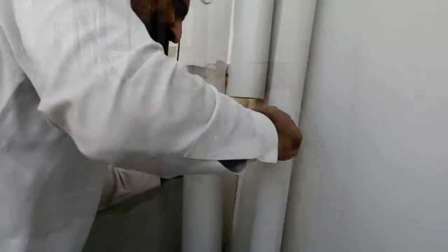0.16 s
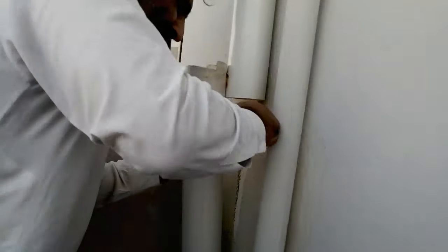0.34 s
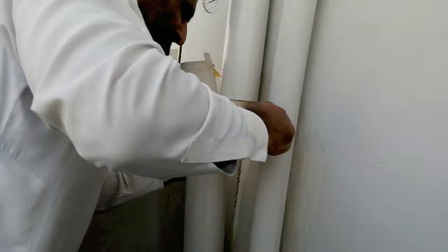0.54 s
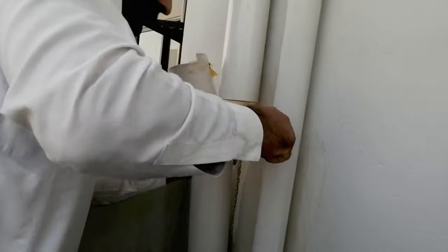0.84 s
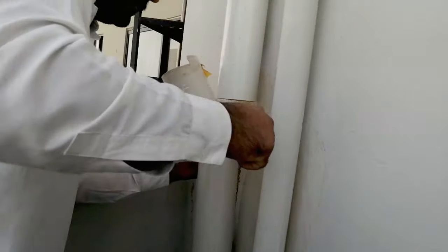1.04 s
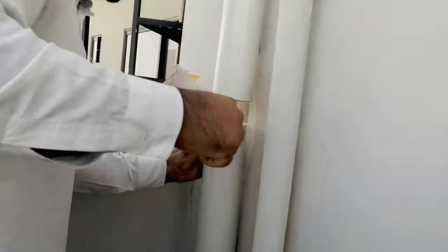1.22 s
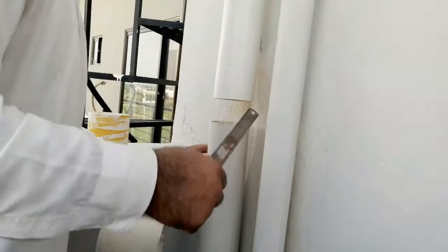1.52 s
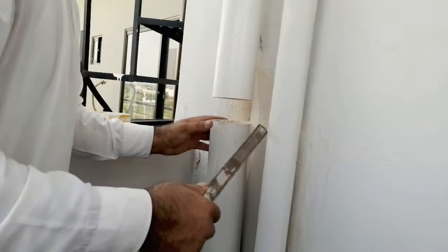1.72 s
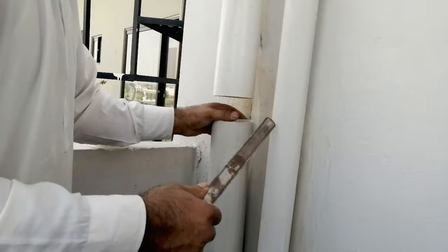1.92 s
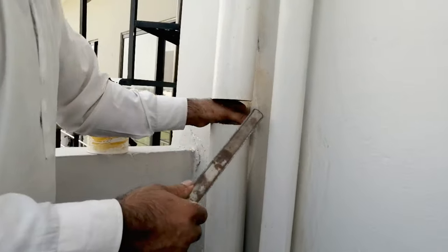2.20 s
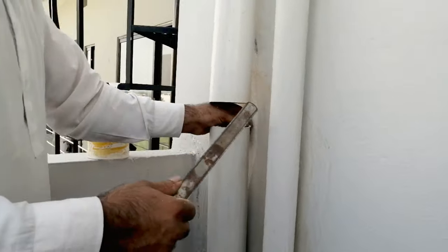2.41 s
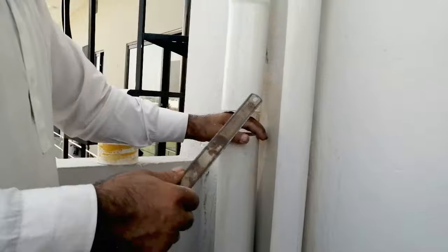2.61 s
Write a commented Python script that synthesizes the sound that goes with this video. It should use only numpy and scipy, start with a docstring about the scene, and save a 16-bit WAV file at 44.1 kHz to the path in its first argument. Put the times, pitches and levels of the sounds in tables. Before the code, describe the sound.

Close phone pickup beside a balcony wall: fast gritty sawing through hollow plastic pipe ends early, followed by soft shuffling, thin blade scrapes, and light plastic rubs and taps over a very faint distant town.

```python
"""Quiet balcony, beside a wall, close to a phone's two microphones; a faint low town lies behind throughout.
First a hand saw rasps through a plastic drain pipe in quick strokes: trains of tooth clicks ring the pipe wall,
and damped jolts mark where the blade catches. At 0.66 s the freed pipe hums as slowly dying modes, then shuffles.
From 0.9 s dense slips and a gliding resonance scrape the blade back out, with knocks among them.
After 2.1 s the loose end rubs and knocks its mate: slips in a plastic colour, cracks, rim modes and thuds."""
import sys
import numpy as np
from scipy import signal
from scipy.fft import rfft, irfft
from scipy.io import wavfile
from scipy.ndimage import uniform_filter1d

SR = 44100
rng = np.random.default_rng(int(sys.argv[2]) if len(sys.argv) > 2 else 0)


def to_wav(sig):
    """Store sig (one row per channel, or 1-D mono) as 16-bit WAV at the path in sys.argv[1].

    Samples outside -1..1 are clipped; the rate is SR.
    """
    pcm = np.clip(np.atleast_2d(sig), -1, 1) * 32767
    pcm = np.round(pcm).astype(np.int16)
    wavfile.write(sys.argv[1], SR, pcm.T)  # frames by channels


N = 121275
T = np.arange(N) / SR  # t/s
HALF_S = SR // 2  # samples in half a second, the length of every short ring

# distant town, relative colour [f/Hz, level/dB]
TOWN_COLOUR = [(20, 2), (50, 8), (90, 4), (170, -4.5), (300, -4), (600, -7.5), (1000, -10), (2000, -30.5),
               (4000, -33), (5400, -24), (8000, -40), (16000, -43)]
TOWN_DB = -52.5

# saw strokes, then two faint chatters of the blade once the pipe is cut through
# [start t/s, attack/s, end of push t/s, release/(dB/s), rasp level/dB,
# fine chip hiss level/dB re rasp, pipe wall level/dB re rasp]
STROKES_AND_CHATTERS = [(-.06, 0.018, .006, 393, -32.5, -20.5, -6),
                        (.065, 0.045, 0.16, 431, -32.5, -26, 6.5),
                        (.241, 0.031, 0.36, 434, -22.5, -28, -4.5), (.388, .045, .47, 183, -25.5, -32, 4.5),
                        (.552, 0.035, 0.6, 280, -23, -27, -0.5), (.616, 0.025, .658, 512, -21.5, -13, -4.5),
                        (.685, 0.016, .714, 350, -36, -10.5, -0.5),
                        (0.734, 0.014, .756, 450, -43.5, -22, 7)]
# rasp of the teeth, relative colour [f/Hz, level/dB]
RASP_COLOUR = [(40, -30), (110, -2.5), (200, -10), (300, 14.5), (430, 3.5), (560, 7), (750, -0.5),
               (1050, -1), (1400, 1), (1800, -6.5), (2800, -9), (4000, -17), (5400, -16), (7000, -15.5),
               (9000, -21.5), (16000, -36.5)]
# wall modes of the clamped pipe [f/Hz, relative level/dB, t60/s]
CLAMPED_PIPE_MODES = [(272.4, 4.5, 0.17), (310, -2.5, 0.26), (523, 2, 0.071), (585.6, -9, 0.27),
                      (658.4, 2.5, 0.063), (826, -6, 0.072), (950, -13.5, 0.07), (1002, -7.5, 0.064),
                      (1305, -25, 0.087), (1416, -20.5, 0.058), (1450, -31, 0.12), (2610, -19, 0.074)]
TOOTH_HZ, SLOWEST_SPEED = 1195.7, .35  # tooth rate at full speed; lowest share of that speed
TOOTH_JITTER, TOOTH_SPREAD_DB = .2, 3.5  # unevenness of tooth rate (natural log) and of click level
CHIP_SHARE = 0.92  # steady chip noise added to the teeth
BITE_DB, BITE_PER_S = 1.94, 140  # the teeth bite unevenly: spread, and cutoff in Hz
SAG_DB_PER_S = 96  # each push weakens after its attack
DRAG_DB, DRAG_WALL_DB = -46.5, -41  # the blade drags between strokes: rasp and wall
THROUGH_S, DRAG_FADE_S = 0.61, 0.078  # the drag has faded out when the cut is through
RUMBLE_DB = -16

# the blade catches and jolts the pipe [t/s, level/dB]
BLADE_CATCHES = [(.11, -28), (0.149, -21), (.175, -25), (0.258, -18.5), (.284, -19.5), (.422, -14),
                 (0.476, -21), (.584, -25), (.647, -24.5), (0.655, -30)]
JOLT_HZ, JOLT_T60_S = 287.7, 0.074

# a thin high ring [t/s, length/s, level/dB before the common gain]
THIN_RING_SWELLS = [(0.231, 0.051, -51.5), (.785, 0.016, -53), (.822, 0.0093, -49), (.858, .012, -54),
                    (1.222, 0.066, -58), (1.775, 0.055, -54), (1.935, .02, -50)]
THIN_RING_HZ, THIN_RING_WIDTH_HZ, THIN_RING_GAIN_DB = 5200, 430, -11.5

# modes of the freed pipe [f/Hz, relative level/dB, t60/s]
FREED_PIPE_MODES = [(168.5, 3.5, 0.63), (300, -12, 0.12), (379, -9, 0.83), (468, -15, 0.26),
                    (662, -11, 0.5), (760, -14, 0.37), (890, -12, 0.39)]
FREED_S, FREED_DB, FREED_WAVER_DB = .657, -28.5, 2

# the loose pipe shuffles in the hand [t/s, length/s, level/dB]
HAND_SHUFFLES = [(.76, .06, -43.5), (.88, 0.036, -49), (.935, 0.042, -43), (1.01, 0.031, -71),
                 (1.88, 0.064, -50), (2.205, 0.036, -46), (2.29, 0.021, -46.5), (2.52, 0.026, -45.5)]
# relative colour of the shuffles [f/Hz, level/dB]
SHUFFLE_COLOUR = [(40, -24), (130, 7.5), (230, 6), (480, 5.5), (700, 1.5), (1100, -13), (2000, -12.5),
                  (16000, -59)]

# scraping effort [t/s, level/dB before the common gain]
SCRAPE_EFFORT = [(.86, -70), (.915, -40.5), (.976, -47), (1.01, -35.5), (1.055, -41), (1.098, -49),
                 (1.134, -65.5), (1.23, -57), (1.278, -50.5), (1.352, -40.5), (1.432, -43.5),
                 (1.548, -36.5), (1.58, -56.5), (1.645, -68.5), (1.67, -57.5), (1.716, -76), (1.805, -60.5),
                 (1.856, -33), (1.905, -44.5), (1.928, -58), (1.972, -59), (2.03, -81), (2.305, -67),
                 (2.326, -51.5), (2.362, -47.5), (2.42, -49), (2.458, -45), (2.535, -41), (2.574, -49.5),
                 (2.62, -64), (2.65, -59), (2.662, -53.5), (2.71, -65), (2.75, -61)]
# blade on plastic, also the saw's chip hiss: relative colour [f/Hz, level/dB]
BLADE_COLOUR = [(60, -12), (300, -6.5), (950, -12), (1500, 1), (2200, -3), (3200, -4.5), (5400, -6),
                (7000, -1), (10000, -4), (16000, -10)]
# plastic on plastic, relative colour [f/Hz, level/dB]
RUB_COLOUR = [(60, -16), (280, -6), (650, -3), (1200, -7.5), (2000, 2), (2900, 2.5), (4000, -1.5),
              (5400, -3), (7000, -0.5), (10000, -7), (16000, -10)]
# resonance of the blade as it slides [t/s, f/Hz]
BLADE_GLIDE = [(.9, 1400), (.99, 1650), (1.04, 2100), (1.1, 2086), (1.3, 1443), (1.41, 1497), (1.48, 1847),
               (1.55, 2092), (1.83, 1745), (1.9, 1548)]
SCRAPE_GAIN_DB, JUDDER_DB = -1, 1.7
SLIPS_PER_S, SLIP_JITTER, SLIP_SPREAD_DB = 7900, .4, 2.5
RUB_FROM_S, RUB_JUDDER_DB = 2.1, 0.9  # plastic on plastic slips less evenly
BLADE_WIDTH_HZ, BLADE_RING_DB = 235, -6.5  # level re scraping effort
OVERTONE_RATIO, OVERTONE_DB = 1.62, -12

# knocks of the pipe end [t/s, click level/dB re crack and rim levels, lower edge of the click f/Hz,
# thud f/Hz, thud level/dB, thud t60/s]
PIPE_KNOCKS = [(0.91, -9.5, 300, 466, -34.5, .05), (1.197, -19.5, 1500, 1500, -64, 0.018),
               (1.262, -13, 4000, 5500, -65, 0.017), (1.903, -10, 292, 247, -40.5, 0.057),
               (1.9829, 5, 850, 1103, -30.5, .04), (2.1604, -1, 181, 568, -28, 0.044),
               (2.2569, -5, 180, 309, -31, 0.069), (2.486, -21, 300, 377, -38.5, 0.014),
               (2.5803, 1.5, 2680, 4660, -37, 0.026), (2.723, -17.5, 2470, 4670, -61, 0.024)]
# modes of the cut rim [f/Hz, relative level/dB, t60/s]
RIM_MODES = [(252, -13, 0.09), (747, -8, 0.046), (1029, -7.5, 0.12), (1140, -8, 0.068), (1340, -4, 0.048),
             (2336, -5.5, 0.029), (2850, -13, 0.023), (3260, -8, 0.017), (4610, -8, 0.028),
             (5780, -10, .025), (7330, -16, .025)]
# relative colour of a crack [f/Hz, level/dB]
CRACK_COLOUR = [(100, -4), (800, 0.5), (1300, 5.5), (2000, 2), (3000, 0.5), (5000, 1), (7000, 2.5),
                (9000, -6), (16000, -13)]
# cluster of modes in a thud [ratio to thud f, level/dB re thud]
THUD_CLUSTER = [(.78, -9), (0.999, 7.5), (1.23, -7)]
RIM_DB, CRACK_DB, CRACK_T60_S = -33, -30.5, 0.058
CONTACT_S = 0.0015  # rise of every knock

# colour of the balcony tail [f/Hz, level/dB]
ROOM_COLOUR = [(60, -2.5), (300, 4), (1000, 0), (3000, -2), (16000, -4)]
ROOM_DB, ROOM_T60_S = -12, 0.33
SPLIT_HZ = 970  # shared bass below, separate treble above
TURN_DB, TURN_S = 5.5, 1.95  # the treble leans left: the knocks lie nearer the middle than the saw

# microphone colour [f/Hz, level/dB]
MIC_COLOUR = [(100, -8.5), (300, -2), (500, -3.5), (800, 0), (1200, 3), (2000, 2), (3200, 6.5), (3850, 0),
              (4700, 5), (5050, 10.5), (5370, 15.5), (5800, 9), (7000, 2), (8000, -5), (12500, -6),
              (14000, -5.5), (15000, -1), (16000, -17)]
# balance of the two ports [f/Hz, left minus right level/dB]
PORT_BALANCE = [(60, 2), (300, -0.5), (700, -1.5), (1300, 0), (2400, -8), (4400, -12), (5600, -10.5),
                (8100, 6), (11000, -1.5), (15000, -10.5)]
TOP_HZ = 16000


def amp(db):
    """Decibels to gain."""
    return np.exp(np.asarray(db) * (np.log(10) / 20))


def unit(x):
    """Scale to rms 1."""
    return x / np.sqrt(np.mean(x ** 2) + 1e-18)


def noise():
    """Two channels of unrelated white noise."""
    return rng.standard_normal((2, N))


def edge(x, hz, kind, order=2):
    """Low-pass or high-pass."""
    return signal.sosfilt(signal.butter(order, hz, kind, fs=SR, output="sos"), x)


def walk(rate_hz):
    """Smooth chance with spread 1, wandering below a cutoff."""
    return unit(edge(rng.standard_normal(N), rate_hz, "low"))


def curve(points):
    """Straight lines through (t/s, value) points."""
    return np.interp(T, *np.array(points).T)


def swells(rows):
    """Bell-shaped swells from (t/s, length/s, level/dB) rows."""
    return sum(amp(db) * np.exp(-np.minimum(((T - at) / length) ** 2, 20)) for at, length, db in rows)


def add(out, start, x):
    """Mix a short sound in at a moment."""
    part = out[..., int(start * SR):][..., :x.shape[-1]]
    part += x[..., :part.shape[-1]]


def conv(x, impulse):
    """Pass a sound through an impulse response."""
    return signal.oaconvolve(np.atleast_2d(x), np.atleast_2d(impulse), axes=1)[:, :x.shape[-1]]


def response(points, share=1):
    """Causal, minimum-phase impulse response of a (f/Hz, level/dB) colour."""
    hz, db = np.array(points, float).T
    size = 2048
    log_hz = np.log(np.fft.rfftfreq(size, 1 / SR) + 1)
    level_db = share * np.interp(log_hz, np.log(hz), db)
    cepstrum = irfft(np.log(amp(level_db)))
    # folding the cepstrum onto positive time makes the response causal
    cepstrum[1:size // 2] *= 2
    cepstrum[size // 2 + 1:] = 0
    return irfft(np.exp(rfft(cepstrum)))


def colour(x, points):
    """Colour a sound without changing the power of white noise."""
    impulse = response(points)
    return conv(x, impulse / np.linalg.norm(impulse))


def fade(t60):
    """Half a second of exponential decay."""
    return np.exp(-np.log(1000) * T[:HALF_S] / t60)


def ring(modes):
    """Damped modes (f/Hz, level/dB, t60/s) after a blow."""
    return sum(amp(db) * fade(t60) * np.sin(2 * np.pi * hz * T[:HALF_S]) for hz, db, t60 in modes)


def band(hz, width_hz):
    """A randomly driven resonance whose centre may move."""
    phase = 2 * np.pi * np.cumsum(hz * np.ones(N)) / SR
    in_phase = edge(noise(), width_hz / 2, "low") * np.cos(phase)
    quadrature = edge(noise(), width_hz / 2, "low") * np.sin(phase)
    return unit(in_phase + quadrature)


def clicks(rate, jitter, spread_db):
    """Uneven train of clicks at a rate per second, with separate levels in the two channels."""
    turns = np.floor(np.cumsum(rate * np.exp(jitter * walk(400))) / SR)
    levels = amp(spread_db * np.clip(noise(), -2, 2))
    return unit(np.diff(turns, prepend=0) * levels)


def town():
    """Distant town: steady noise, mostly low; bass shared by the ports in scene(), treble separate."""
    return amp(TOWN_DB) * colour(noise(), TOWN_COLOUR)


def saw():
    """Teeth tear chips, or chatter at the end, at a rate that follows each push; the pipe wall rings with them."""
    dragging = np.clip((THROUGH_S - T) / DRAG_FADE_S, 0, 1)
    force = amp(DRAG_DB) * dragging
    shake = amp(DRAG_WALL_DB) * dragging
    hiss = 0
    speed = np.full(N, SLOWEST_SPEED)
    for start, attack, end, release_db_per_s, db, hiss_db, wall_db in STROKES_AND_CHATTERS:
        rise = np.clip((T - start) / attack, 0, 1) ** 2
        sag_db = SAG_DB_PER_S * np.maximum(T - start - attack, 0)
        release_db = release_db_per_s * np.maximum(T - end, 0)
        push = rise * amp(db - sag_db - release_db)
        force = np.hypot(force, push)
        shake = np.hypot(shake, push * amp(wall_db))
        hiss = hiss + push * amp(hiss_db)
        progress = np.clip((T - start) / (end - start + .03), 0, 1)
        speed = np.maximum(speed, np.sin(np.pi * progress))
    # denser clicks are made weaker, so speed alone does not change the power
    teeth = clicks(TOOTH_HZ * speed, TOOTH_JITTER, TOOTH_SPREAD_DB) * np.sqrt(speed.mean() / speed)
    chips = teeth - uniform_filter1d(teeth, size=200) + CHIP_SHARE * noise()
    cut = unit(chips * amp(BITE_DB * walk(BITE_PER_S)))
    wall = ring(CLAMPED_PIPE_MODES)
    rasp = colour(cut * force, RASP_COLOUR)
    wall_ring = conv(cut * shake, wall / np.linalg.norm(wall))
    chip_hiss = colour(hiss * cut, BLADE_COLOUR)
    rumble = amp(RUMBLE_DB) * np.sqrt(shake * shake.max()) * band(115, 88)
    return rasp + wall_ring + chip_hiss + rumble


def catches():
    """The blade catches now and then, each time jolting one damped mode of the pipe."""
    out = np.zeros(N)
    jolt = ring([(JOLT_HZ, 0, JOLT_T60_S)])
    for at, db in BLADE_CATCHES:
        add(out, at, amp(db) * jolt)
    return out


def thin_ring():
    """A faint, high, narrow band of noise swells briefly."""
    return amp(THIN_RING_GAIN_DB) * band(THIN_RING_HZ, THIN_RING_WIDTH_HZ) * swells(THIN_RING_SWELLS)


def freed_pipe():
    """Freed at the last catch, the pipe hums on in its own damped modes, wavering in level."""
    hum = np.zeros(N)
    add(hum, FREED_S, ring(FREED_PIPE_MODES))
    return amp(FREED_DB + FREED_WAVER_DB * walk(38)) * hum


def shuffles():
    """The loose pipe shuffles in the hand as soft swells of low noise."""
    return colour(noise() * swells(HAND_SHUFFLES), SHUFFLE_COLOUR)


def scrapes():
    """Dense slips of the blade in the cut, with a gliding resonance; later the pipe ends rub together."""
    effort = amp(curve(SCRAPE_EFFORT) + SCRAPE_GAIN_DB + JUDDER_DB * walk(73))
    grains = clicks(np.full(N, SLIPS_PER_S), SLIP_JITTER, SLIP_SPREAD_DB) * np.sign(noise())
    slips = effort * unit(grains + .6 * noise())
    blade = T < RUB_FROM_S
    glide_hz = curve(BLADE_GLIDE)
    tone = amp(BLADE_RING_DB) * band(glide_hz, BLADE_WIDTH_HZ)
    overtone = amp(OVERTONE_DB) * band(glide_hz * OVERTONE_RATIO, 2 * BLADE_WIDTH_HZ)
    blade_scrape = colour(slips * blade, BLADE_COLOUR)
    pipe_rub = colour(slips * ~blade * amp(RUB_JUDDER_DB * walk(160)), RUB_COLOUR)
    return blade_scrape + pipe_rub + (tone + overtone) * effort * blade


def knocks():
    """Each knock is a short crack, the ring of the rim and a thud that depends on where it lands."""
    out = np.zeros((2, N))
    rim = amp(RIM_DB) * ring(RIM_MODES)
    contact = np.clip(T[:HALF_S] / CONTACT_S, 0, 1)
    for at, db, low_hz, hz, thud_db, t60 in PIPE_KNOCKS:
        burst = rng.standard_normal((2, HALF_S)) * fade(CRACK_T60_S)
        crack = amp(CRACK_DB) * colour(burst, CRACK_COLOUR)
        thud = ring([(hz * ratio, thud_db + mode_db, t60) for ratio, mode_db in THUD_CLUSTER])
        click = amp(db) * edge(crack + rim, low_hz, "high")
        add(out, at, contact * (click + thud))
    return out


def scene():
    """The bass reaches both ports alike; each gets its own scatter of treble grains and a weak balcony tail."""
    x = town() + saw() + catches() + thin_ring() + freed_pipe() + shuffles() + scrapes() + knocks()
    turn_db = TURN_DB * np.clip((T - TURN_S) / .03, 0, 1)
    bass = edge(x[0], SPLIT_HZ, "low", order=3)
    treble = edge(x, SPLIT_HZ, "high", order=3) * amp([turn_db / 2, -turn_db / 2])
    near = bass + treble
    room = rng.standard_normal((2, HALF_S)) * fade(ROOM_T60_S)
    tail = conv(room / np.linalg.norm(room[0]), response(ROOM_COLOUR))
    return near + amp(ROOM_DB) * conv(near, tail)


def record(dry):
    """The phone's ports ring near 5 kHz, the right one brighter there; the top is cut."""
    ports = np.array([response(PORT_BALANCE, side / 2) for side in (1, -1)])
    heard = conv(conv(dry, response(MIC_COLOUR)), ports)
    return signal.sosfilt(signal.ellip(8, .2, 70, TOP_HZ, fs=SR, output="sos"), heard)


dry = scene()
out = record(dry)
to_wav(out)
```